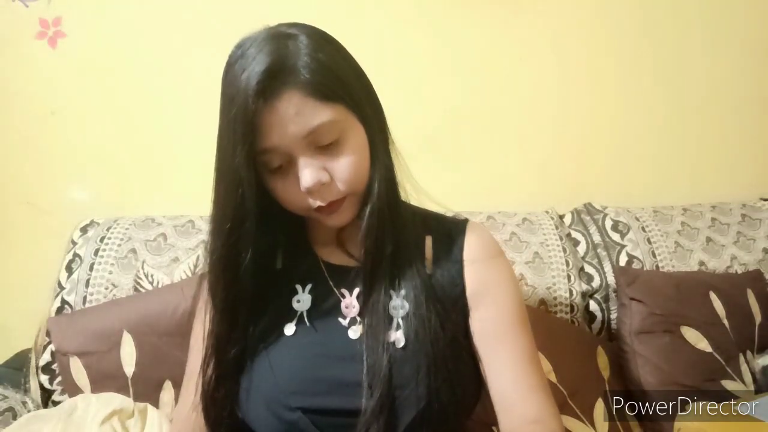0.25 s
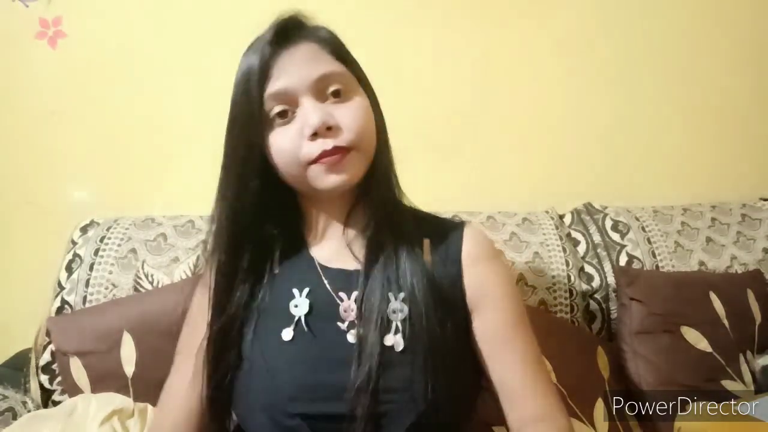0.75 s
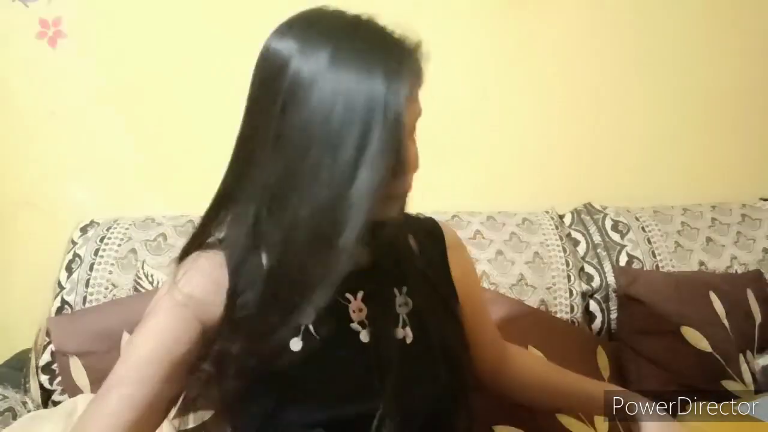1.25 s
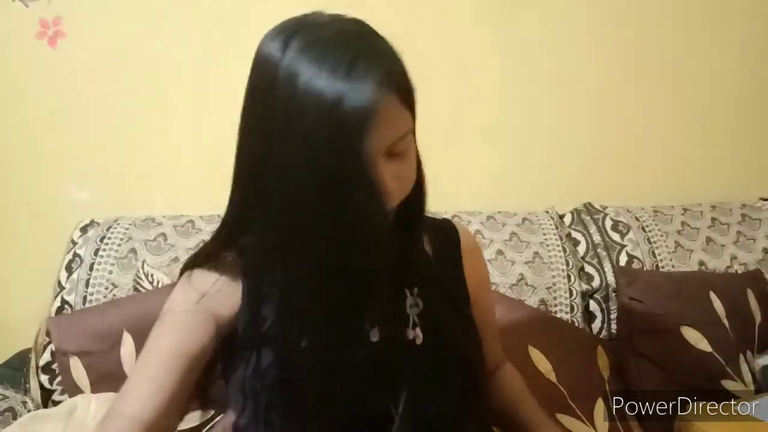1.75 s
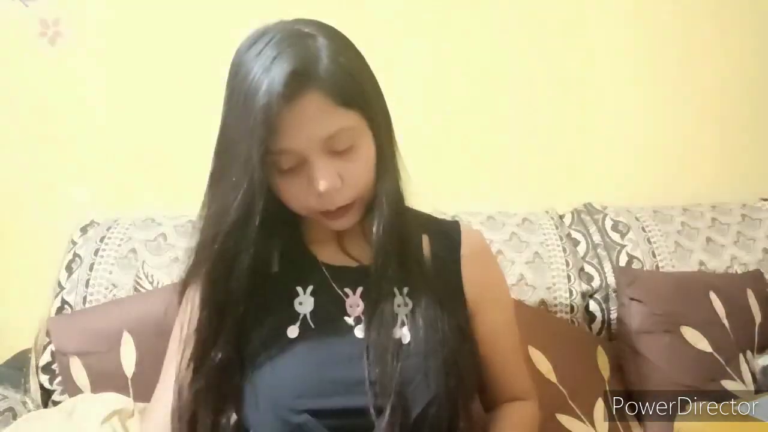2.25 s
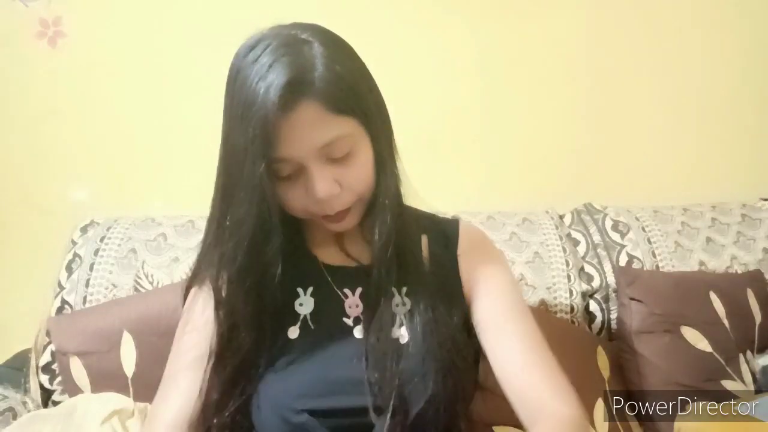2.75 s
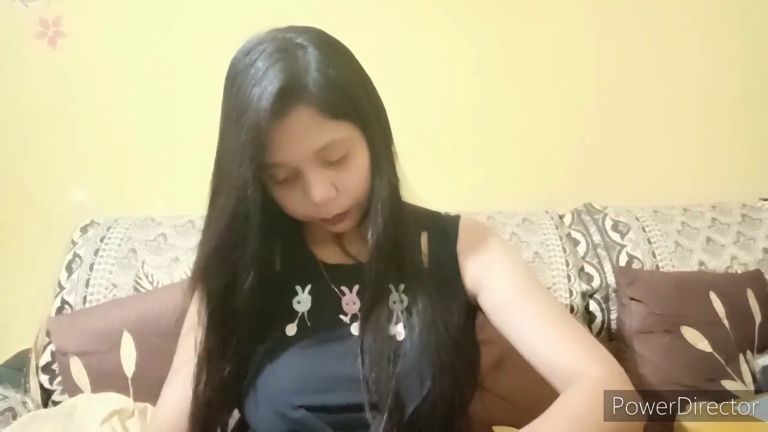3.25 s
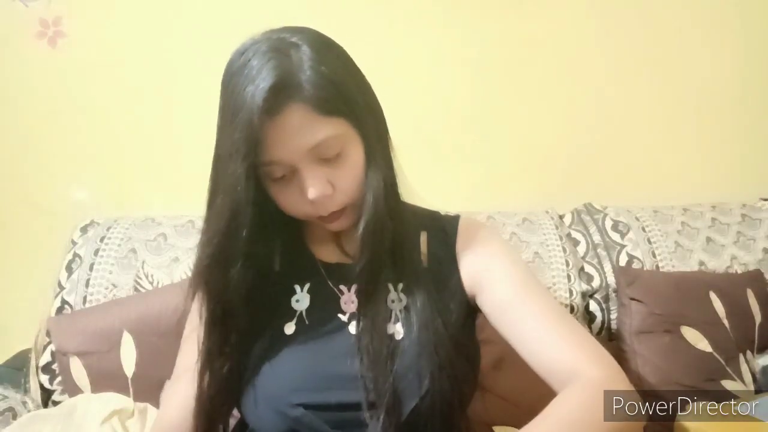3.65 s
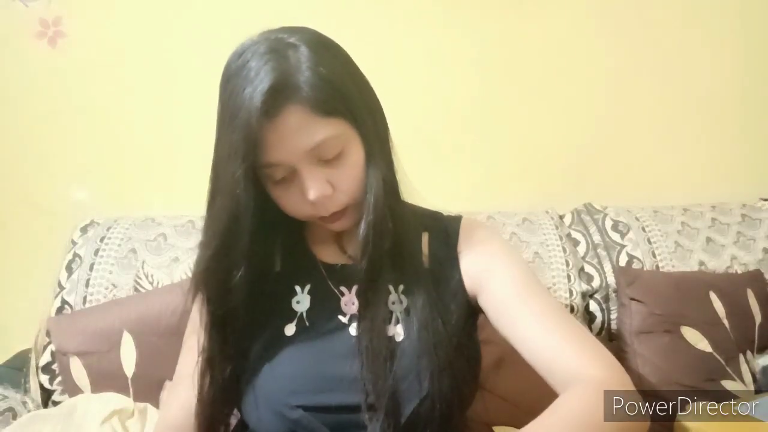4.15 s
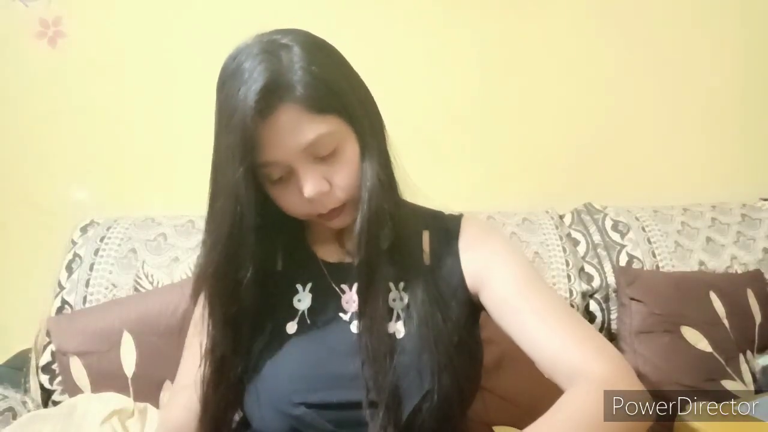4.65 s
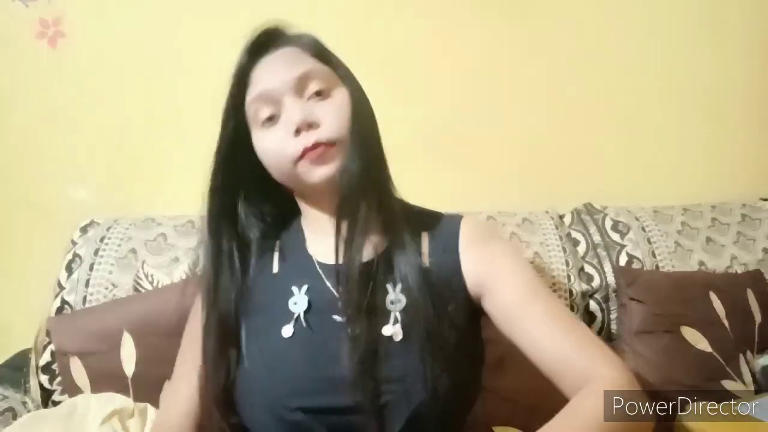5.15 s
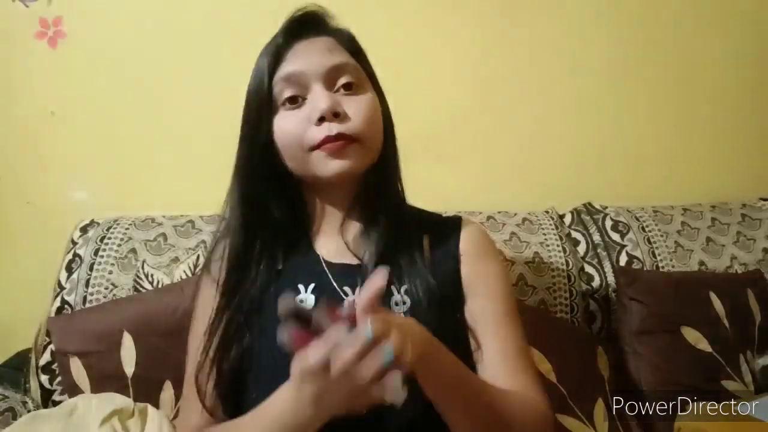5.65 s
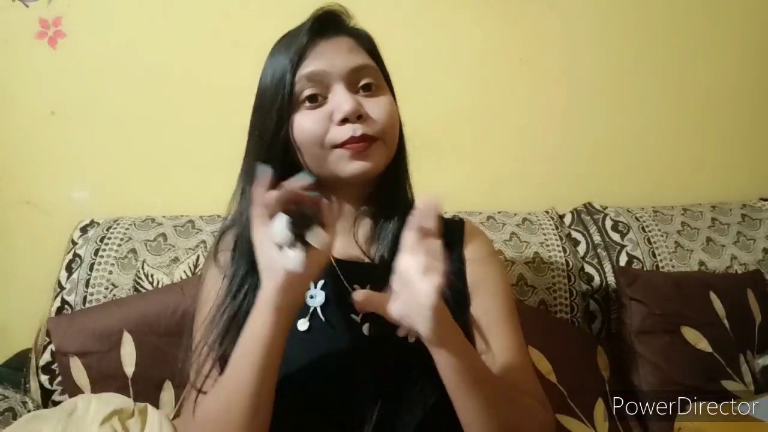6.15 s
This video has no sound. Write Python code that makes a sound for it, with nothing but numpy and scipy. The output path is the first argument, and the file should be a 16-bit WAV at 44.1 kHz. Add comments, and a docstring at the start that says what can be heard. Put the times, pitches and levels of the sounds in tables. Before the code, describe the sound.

Small plastic lipstick tubes are handled indoors over the constant rush of a fan. After a single early click, moving air rumbles against the microphone. Then comes a run of light, hollow clacks and short scrapes as the tubes jostle each other, with faint hand rustling, easing to a few isolated taps. Low wind puffs keep returning, and the room adds only a short reverberation.

```python
"""A fan whooshes steadily in a small furnished room, and its draught thumps on two microphone ports in turn.
Plastic lipstick tubes are picked up and knock together: each impact gives a crack and a short ring
of the case's modes, and shakes its neighbours. Stick-slip friction makes tubes scrape and hands
rustle faintly. The room reflects these sounds, and pipe resonances in the ports colour the treble."""
import sys
import numpy as np
from scipy import signal
from scipy.fft import rfft, irfft
from scipy.io import wavfile
from scipy.ndimage import uniform_filter1d

SR = 44100
rng = np.random.default_rng(int(sys.argv[2]) if len(sys.argv) > 2 else 0)


def put_to_file(sound):
    """Save the sound as 16-bit audio at rate SR, in the file named by the first command-line argument."""
    columns = np.atleast_2d(sound).T  # one column per channel
    safe = np.clip(columns, -1, 1)
    whole_steps = np.round(safe * 32767)
    wavfile.write(sys.argv[1], SR, whole_steps.astype(np.int16))


N = 282681
TIME = np.arange(N) / SR
FREQS = np.fft.rfftfreq(N, 1 / SR)


def undb(db):
    """Decibels to amplitude ratio."""
    return 10 ** (np.asarray(db) / 20)


def shape(points, hz=FREQS):
    """Interpolation of (frequency_hz, value) points on a log-frequency axis."""
    point_hz, value = np.transpose(points)
    return np.interp(np.log(hz + 1), np.log(point_hz), value)


def noise(gain):
    """Gaussian noise of rms 1, filtered by a gain per frequency."""
    x = irfft(rfft(rng.standard_normal(N)) * gain, N)
    return x / x.std()


def walk(rate_hz):
    """Smooth random fluctuation: low-passed noise of rms 1."""
    return noise(1 / (1 + (FREQS / rate_hz) ** 4) * (FREQS > 0))


def response(points, size=512):
    """Minimum-phase impulse response through (frequency_hz, gain_db) points."""
    cepstrum = irfft(np.log(undb(shape(points, np.fft.rfftfreq(size, 1 / SR)))))
    cepstrum[1:size // 2] *= 2
    cepstrum[size // 2 + 1:] = 0
    return irfft(np.exp(rfft(cepstrum)))


def decay(t, t60):
    """Exponential damping by 60 dB in t60 seconds."""
    return np.exp(-np.log(1000) * t / t60)


def envelope(events, rise_db_per_s, sag_db_per_s, fall_db_per_s):
    """Power sum of (start_s, length_s, level_db) events that rise to their start, sag and then fall."""
    power = 0
    for start_s, length_s, level_db in events:
        age = TIME - start_s
        drop_db = rise_db_per_s * np.maximum(-age, 0) + sag_db_per_s * np.clip(age, 0, length_s)
        drop_db += fall_db_per_s * np.maximum(age - length_s, 0)
        power = power + undb(np.maximum(level_db - drop_db, -120)) ** 2
    return np.sqrt(power)


def fan(level_db=-29.0, sway_db=1.03, left_lag_s=.00007):
    """Flow noise excites resonances of fan and room; long waves reach both ports nearly alike."""
    # rush of air: frequency_hz, density_db
    rush = [(40, -14.5), (120, -22), (185, -2.5), (280, -9), (380, -5), (500, -7.5), (770, -10), (950, -15),
            (1500, -11.5), (2000, -17.5), (3000, -28), (5000, -34.5), (10000, -41), (16000, -44)]
    # resonances: centre_hz, width_hz, lift_db
    modes = [(227, 59, 10.5), (355, 93, 4), (428, 9.1, 3), (612.6, 13.3, 6.5), (769, 55, 4.5),
             (1149, 111, 8.5)]
    # likeness at the two ports: frequency_hz, correlation
    coherence = [(60, 0.99), (200, 1), (380, 0.9), (700, 0.7), (1300, 0.44), (2400, 0.17), (4000, 0.039)]
    db = shape(rush) + sum(lift / (1 + (2 * (FREQS - hz) / width) ** 2) for hz, width, lift in modes)
    alike = np.clip(shape(coherence), 0, 1)
    mid, side = rfft(rng.standard_normal((2, N))) * undb(db) * np.sqrt([1 + alike, 1 - alike])
    lag = np.exp(-2j * np.pi * FREQS * left_lag_s)  # the fan stands a little to the right
    air = irfft([(mid + side) * lag, mid - side], N)
    return air / air.std() * undb(level_db + sway_db * walk(16.3))


def draught(port):
    """Unsteady flow: the strength of the air at one port, as gusts over a faint wandering stir."""
    # gusts: start_s, length_s, level_db, port
    gusts = [ (0.462, 0.096, -32, "left"), (0.636, 0.13, -25, "left"), (0.682, 0.037, -37, "right"),
             (1.103, 0.068, -15.5, "right"), (1.162, 0.13, -10, "right"), (1.333, 0.035, -21.5, "right"),
             (1.439, 0.086, -15, "right"), (1.512, 0.034, -10, "left"), (1.59, 0.041, -15.5, "right"),
             (1.596, 0.014, -20, "left"), (1.692, 0.029, -21, "right"), (1.824, 0.029, -17, "left"),
             (1.877, 0.068, -24, "right"), (2.027, 0.05, -25.5, "left"), (2.324, 0.038, -30.5, "left"),
             (2.582, 0.034, -14.5, "right"), (2.594, 0.033, -38, "left"), (2.692, 0.013, -14, "right"),
             (2.7, 0.04, -26, "left"), (2.844, 0.054, -18.5, "right"), (2.95, 0.17, -30.5, "left"),
             (3.04, 0.02, -25, "left"), (3.133, 0.058, -38, "left"), (3.485, 0.045, -32, "right"),
             (3.533, 0.056, -23, "left"), (4.02, 0.045, -25, "left"), (4.076, 0.039, -31, "right"),
             (4.183, 0.11, -39, "left"), (4.248, 0.14, -25.5, "right"), (4.478, 0.092, -20, "right"),
             (4.502, 0.13, -15, "left"), (4.572, 0.035, -12.5, "right"), (4.656, 0.046, -20, "right"),
             (4.719, 0.035, -17.5, "left"), (4.79, 0.05, -28, "left"), (4.873, 0.026, -21, "right"),
             (4.98, 0.031, -23, "right"), (5.037, 0.14, -24.5, "left"), (5.397, 0.02, -22, "left"),
             (5.471, 0.015, -23, "right"), (5.654, 0.33, -34, "left"), (5.737, 0.092, -19.5, "right"),
             (5.885, 0.13, -17.5, "right"), (6.06, 0.12, -22, "right"), (6.084, 0.032, -32, "left"),
             (6.31, 0.13, -28, "right")]
    hits = [(start_s, length_s, db) for start_s, length_s, db, side in gusts if side == port]
    calm = undb(-51 + 3 * walk(4.1))
    return envelope(hits, rise_db_per_s=418, sag_db_per_s=19, fall_db_per_s=348) + calm


def buffet(gust, gain_db, steady_s=0.099, flutter_db=2, fine_db=1, fine_hz=180, ceiling=.85):
    """Turbulence presses on a port; strong gusts break up into finer, higher-pitched eddies."""
    # eddy pressure: frequency_hz, density_db
    spectrum = [(12, -28), (28, 0.5), (55, 1.5), (100, -0.5), (170, -5.5), (250, -12.5), (400, -58),
                (900, -56)]
    eddies = noise(undb(shape(spectrum)) * (FREQS < 2000))
    eddies /= np.sqrt(uniform_filter1d(eddies ** 2, int(steady_s * SR)))
    fine = noise((FREQS / fine_hz) ** 2 / (1 + (FREQS / fine_hz) ** 6))
    pressure = (eddies + undb(fine_db) * gust * fine) * gust * undb(gain_db + flutter_db * walk(11.7))
    # a soft limit rounds the loudest wind thumps so they do not clip
    return ceiling * np.tanh(pressure / ceiling)


def rustle(holding_db=-52, rough_db=3, slips_per_s=260, slip_db=-2, spread_db=4):
    """Friction of skin and plastic: a soft hiss with tiny slips, faintest while fingers only hold on."""
    # friction noise: frequency_hz, density_db
    spectrum = [(300, -16), (900, 16), (2000, 7.5), (5000, -7), (9000, -7.5), (15000, -13)]
    # slides of hands, hair and tubes: start_s, length_s, level_db
    slides = [(1.77, 0.065, -48.5), (2.89, 0.19, -43.5), (3.62, 0.035, -42), (5.98, 0.11, -41.5)]
    colour = undb(shape(spectrum))
    slips = (rng.random(N) < slips_per_s / SR) * undb(spread_db * rng.standard_normal(N))
    bursts = np.sqrt(np.abs(uniform_filter1d(slips ** 2, SR // 1000)))
    grip = undb(rough_db * walk(60)) + undb(slip_db) * bursts / np.sqrt(np.mean(bursts ** 2))
    sliding = envelope(slides, rise_db_per_s=100, sag_db_per_s=0, fall_db_per_s=108) + undb(holding_db)
    return np.array([noise(colour), noise(colour)]) * sliding * grip / 2


def crack(t, colour, rise_s=.0007):
    """Impact noise: hard edges scrape for an instant, heard at each port by its own path."""
    burst = rfft(rng.standard_normal((2, len(t))) * t * np.exp(-t / rise_s))
    flattened = burst / np.sqrt(np.abs(burst))
    pulse = irfft(flattened, len(t))[:, :SR // 200]
    pulse /= np.linalg.norm(pulse, axis=1, keepdims=True)
    return irfft(rfft(pulse, len(t)) * rfft(response(colour), len(t)), len(t))


def ring(t, part, colour, detune=0.0068):
    """Free vibration: the struck part rings in damped modes, which every grip detunes a little."""
    # modes of each part of a tube: pitch_hz, t60_s, level_db
    modes = {"case": [(1450, .022, -22), (2280, .012, -19)], "sleeve": [(1450, .015, -23),
             (5300, .006, -18)], "hollow": [(1500, .02, -16.5), (2650, .008, -24), (3650, .006, -19)],
             "barrel": [(1720, 0.018, -36), (2390, 0.0098, -17.5), (6500, 0.0089, -16)],
             "base": [(1450, .016, -19), (2610, .021, -17.5), (5200, .025, -28)], "cap": [(1470, .025, -27),
             (3650, .0045, -11), (5200, .005, -15), (6900, .004, -24), (9500, .008, -19.5)],
             "catch": [(3480, .006, -11.5), (6940, .007, -31), (8000, .005, -22), (10400, .005, -17)],
             "rim": [(1350, .012, -29), (4850, .007, -22), (6900, .0055, -19.5), (8730, .0065, -26.5)]}
    out = 0
    for hz, t60, db in modes[part]:
        age = np.maximum(t - rng.random((2, 1)) / hz, 0)  # out of step at the two ports
        pitch_hz = hz * (1 + detune * rng.standard_normal())
        out += undb(db + shape(colour, hz)) * np.sin(2 * np.pi * pitch_hz * age) * decay(age, t60)
    return out


def tubes(contacts):
    """Impulsive excitation: the spectrum of each contact weights both its crack and its ring."""
    t = TIME[:SR // 8]
    out = np.zeros((2, N + len(t)))
    for start_s, part, body_db, edge_db in contacts:
        colour = [(150, body_db - 24), (600, body_db - 6), (1400, body_db + 3.5), (3200, body_db),
                  (6500, edge_db), (10000, edge_db), (14000, edge_db - 11)]
        start = int(start_s * SR)
        out[:, start:start + len(t)] += crack(t, colour) + ring(t, part, colour)
    return out[:, :N]


def jostle(contacts, gain_db=-7, settle_s=0.0098, knocks_per_s=900):
    """Secondary collisions: a blow shakes the neighbouring tubes, which chatter and quickly settle."""
    # response of the pile of hollow cases: frequency_hz, gain_db
    pile = [(200, -2), (600, 16), (1400, 17.5), (2500, 10.5), (4500, 2), (9000, -7), (15000, -47)]
    t = TIME[:SR // 12]
    out = np.zeros((2, N + len(t)))
    for start_s, _, body_db, _ in contacts:
        knocks = (rng.random((2, len(t))) < knocks_per_s / SR) * rng.standard_normal((2, len(t)))
        chatter = knocks * np.exp(-t / settle_s) / np.sqrt(knocks_per_s * settle_s / 2)
        start = int(start_s * SR)
        out[:, start:start + len(t)] += undb(body_db + gain_db) * chatter
    return signal.fftconvolve(out, response(pile)[None])[:, :N]


def ticks(count=10, sorting_s=(2.2, 5.3), body_db=-17, edge_db=-26, spread_db=2.5):
    """Light impacts fall at random while the tubes are sorted; returns contact rows."""
    # surfaces that may touch: part
    parts = ("case", "sleeve", "barrel", "rim")
    rows = []
    for when, which, force in rng.random((count, 3)):
        start_s = np.interp(when, (0, 1), sorting_s)
        db = spread_db * (2 * force - 1)
        rows.append((start_s, parts[int(which * len(parts))], body_db + db, edge_db + db))
    return rows


def scrapes(catches_per_s=450, spread_db=3):
    """Stick-slip friction: a dragged tube makes a dense, uneven run of catches; returns contact rows."""
    # one tube dragged along another: start_s, length_s, part, body_db, edge_db (levels of one catch)
    drags = [(2.872, .06, "rim", -16, -21), (2.935, .045, "sleeve", -13, -18),
             (3.148, .013, "rim", -13, -17), (3.632, .04, "barrel", -11, -20)]
    rows = []
    for start_s, length_s, part, body_db, edge_db in drags:
        for k, (late, force) in enumerate(rng.random((40, 2))):
            age = (k + late) / catches_per_s
            db = spread_db * (2 * force - 1)
            if age < length_s:
                rows.append((start_s + age, part, body_db + db, edge_db + db))
    return rows


def room(sound, wet_db=-5.0, t60=0.23, treble_t60=0.2, grain=0.22, build_s=.007, hand_move_s=.1):
    """Reverberation: reflections build up quickly, differ at each port and change as the hands move."""
    t = TIME[:SR // 3]
    lowpass = signal.butter(2, 6000, fs=SR, output="sos")
    step = int(hand_move_s * SR)
    fade = np.sin(np.pi * np.arange(2 * step) / (2 * step))
    build = 1 - np.exp(-(t / build_s) ** 2)
    wet = np.zeros((2, N + len(t)))
    for start in range(0, N, step):
        echoes = rng.standard_normal((2, len(t))) * np.exp(grain * rng.standard_normal((2, len(t))))
        low = signal.sosfiltfilt(lowpass, echoes)
        # soft furniture absorbs the treble sooner
        tail = build * (low * decay(t, t60) + (echoes - low) * decay(t, treble_t60))
        tail /= np.linalg.norm(tail, axis=1, keepdims=True)
        direct = sound[:, start:start + 2 * step]
        reflected = signal.fftconvolve(direct * fade[:direct.shape[1]], tail, axes=1)
        wet[:, start:start + reflected.shape[1]] += reflected
    return sound + undb(wet_db) * wet[:, :N]


def scene():
    """Superposition of the fan, its draught on the ports, and the hands and tubes in the room."""
    # contacts of the tubes: start_s, part, body_db (near 3 kHz), edge_db (near 8 kHz)
    clicks = [ (0.5432, "catch", -2.5, 0), (0.554, "sleeve", -14, -3.5), (2.8161, "barrel", -5.5, -47),
              (2.8505, "rim", -15, -17), (2.855, "rim", -10, -20), (2.8697, "rim", -9, -9),
              (2.878, "sleeve", -10, -23), (2.902, "sleeve", -15, -26), (2.917, "barrel", -9, -25),
              (2.940, "sleeve", -2, -9), (2.9502, "sleeve", -5, -6), (2.954, "barrel", -1, -23),
              (2.979, "barrel", -14, -26), (3.1441, "sleeve", -1, -9), (3.161, "rim", 1.5, 3),
              (3.2145, "hollow", -7, -38), (3.2483, "catch", -13, -16), (3.253, "catch", -12, -12),
              (3.266, "hollow", 1, -11), (3.2745, "case", -15, -20), (3.63, "sleeve", 0, -6.5),
              (3.633, "barrel", -6, -6.5), (3.642, "barrel", 1.5, -14), (3.651, "case", -10, -20),
              (3.657, "sleeve", -12, -14), (3.664, "hollow", -21, -19), (3.672, "sleeve", -12, -7),
              (3.6996, "barrel", -8, -26), (3.7576, "sleeve", -11, -15), (3.766, "case", -4, -15),
              (3.7848, "base", -4, -13.5), (3.9574, "case", -6, -38), (4.363, "rim", -5.5, -30),
              (4.3815, "catch", -2.5, -11), (4.391, "sleeve", -4, -10), (4.461, "rim", -11, -22),
              (4.546, "case", -7.5, -29), (4.651, "rim", -12, -13), (4.6547, "sleeve", -1, -4.5),
              (4.754, "barrel", -5, -17), (4.896, "cap", 2, 2.5), (4.9055, "case", -5.5, -4),
              (5.086, "hollow", -13.5, -20), (5.522, "sleeve", -9.5, -9.5), (5.729, "case", -9, -29)]
    wind = np.array([buffet(draught("left"), gain_db=-0.5), buffet(draught("right"), gain_db=-2.0)])
    air = fan()
    contacts = clicks + ticks()
    handling = rustle() + tubes(contacts + scrapes()) + jostle(contacts)
    return air + wind + room(handling)


def record(dry, top_hz=15700):
    """Pipe resonance colours the treble differently in each microphone port; a low-pass cuts the top."""
    # responses of the two ports: frequency_hz, gain_db
    left_port = [(2000, 0.5), (3500, -1), (4500, -1.5), (5700, -3.5), (6700, -17), (8000, -1), (8900, 3),
                 (9500, 10.5), (10400, 4.5), (11200, 1), (13000, 2.5), (14500, -24), (16000, -19)]
    right_port = [(2000, 1.5), (4000, 2), (5700, 6), (7000, 12), (8000, 0), (9000, -2.5), (10300, -29),
                  (11700, -26), (12700, 5.5), (13700, -3), (15200, 3)]
    coloured = [signal.fftconvolve(x, response(port))[:N] for x, port in zip(dry, (left_port, right_port))]
    lowpass = signal.ellip(10, .2, 80, top_hz, fs=SR, output="sos")
    return signal.sosfilt(lowpass, coloured)


dry = scene()
out = record(dry)
put_to_file(out)
```